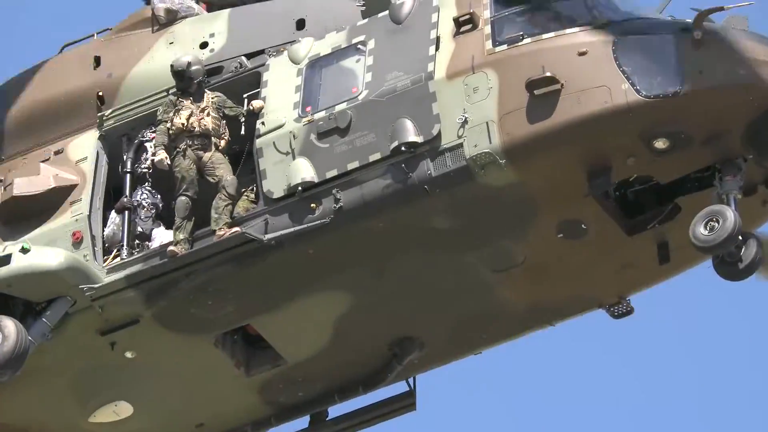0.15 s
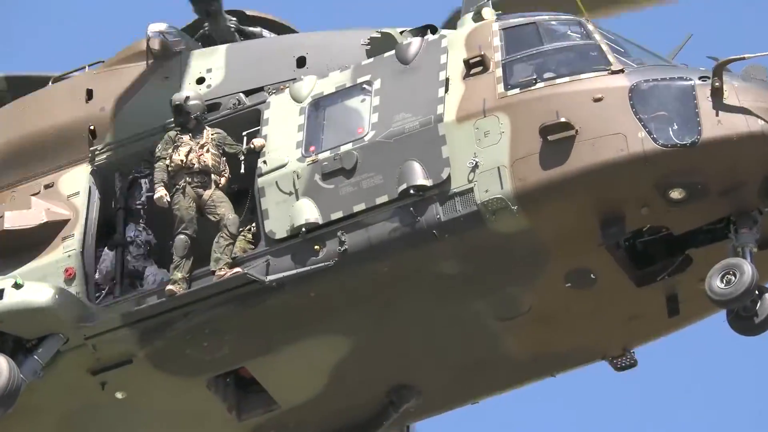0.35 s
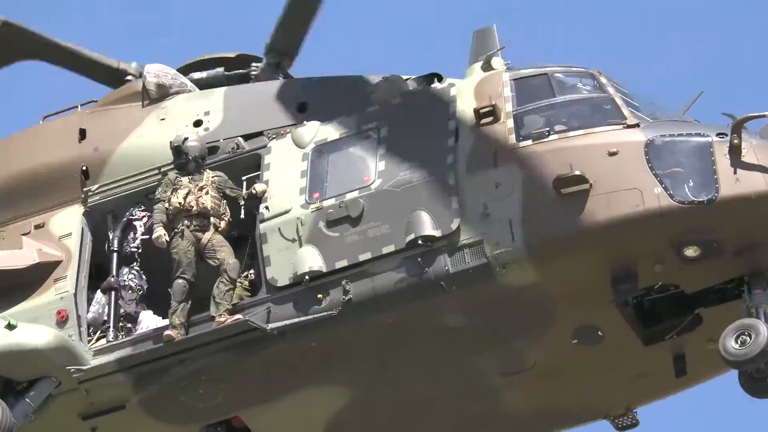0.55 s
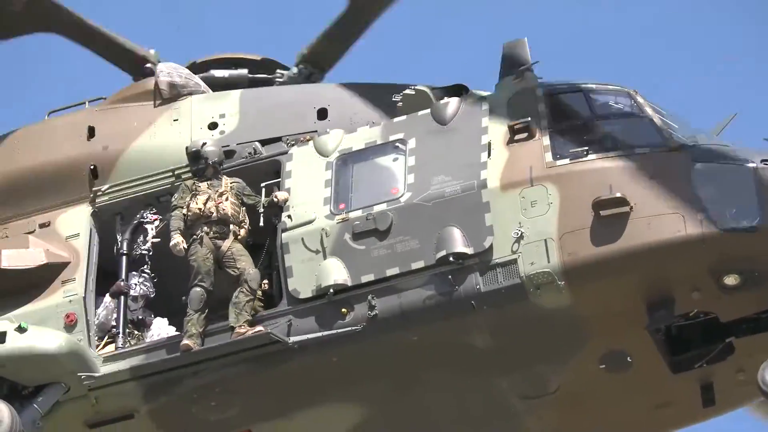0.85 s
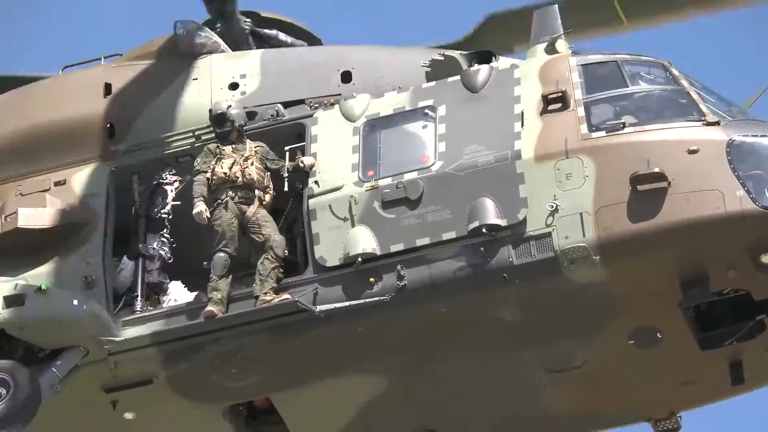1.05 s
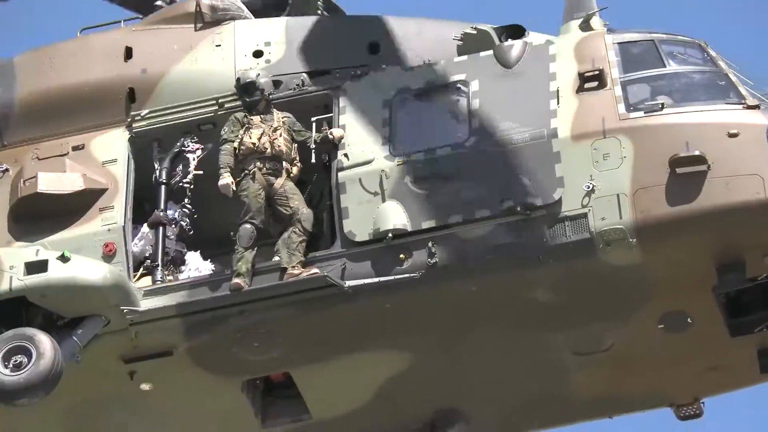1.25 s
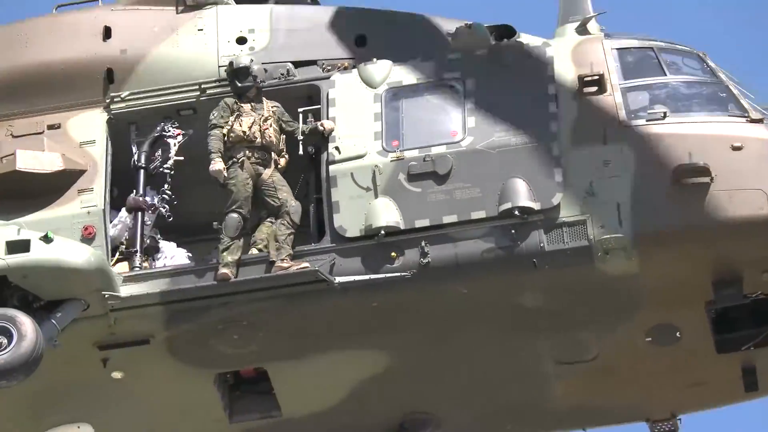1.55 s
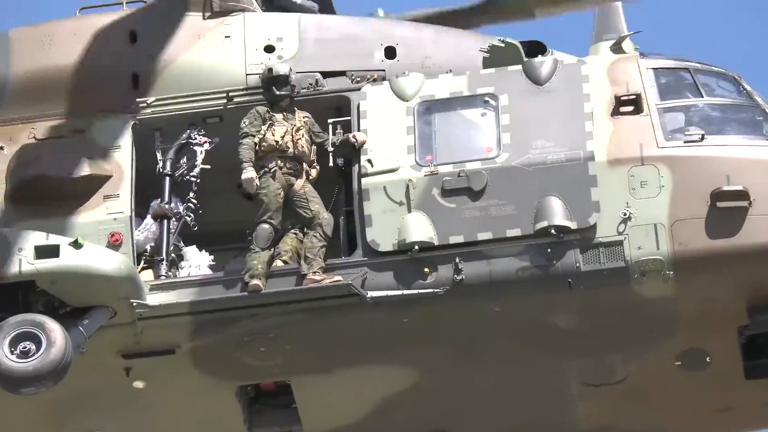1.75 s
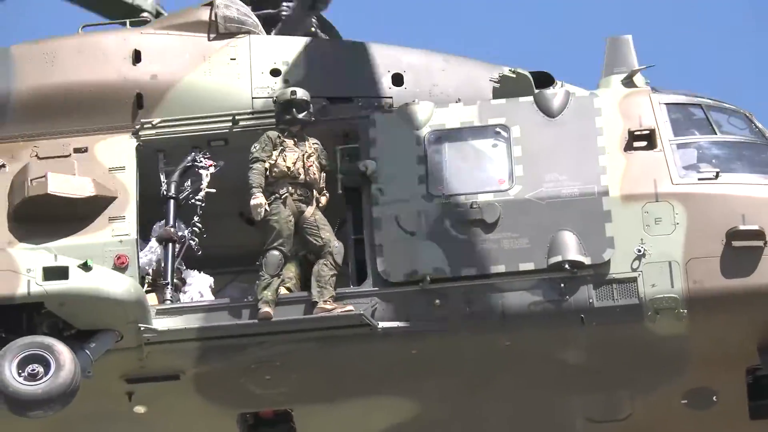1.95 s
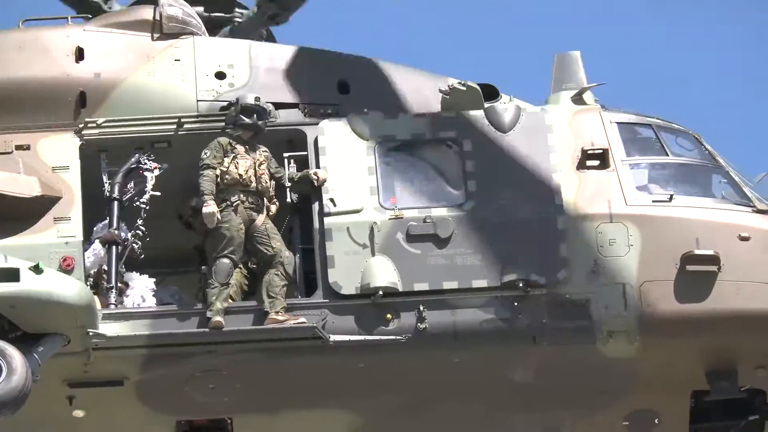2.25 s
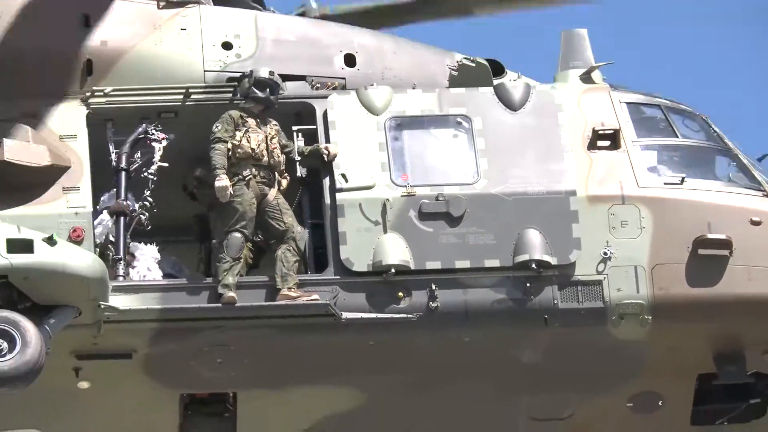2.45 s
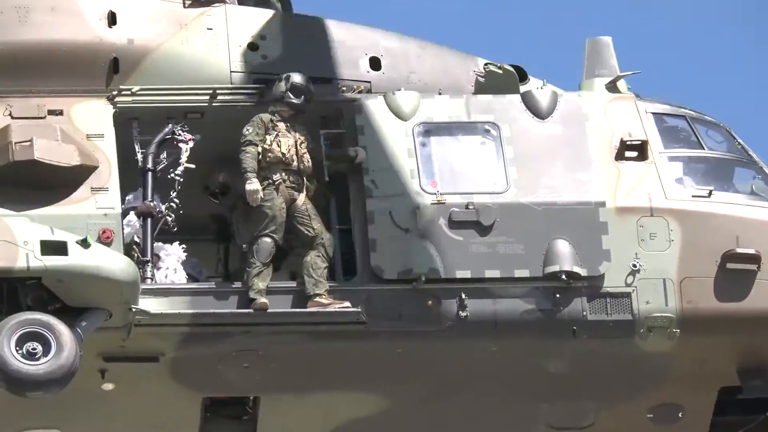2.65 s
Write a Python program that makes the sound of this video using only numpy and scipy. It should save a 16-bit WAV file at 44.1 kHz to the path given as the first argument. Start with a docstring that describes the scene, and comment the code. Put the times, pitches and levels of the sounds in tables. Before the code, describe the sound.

Close helicopter passing overhead outdoors: fast uneven chopping slaps lead at first, then harder cracks sit in a thickening roar, buzzing tail rotor and hiss; short ground echoes, wide treble, abrupt level dips from the overloaded microphone.

```python
"""Outdoors, under a low helicopter. Main blades slap, then tear the air with a crackling swish.
Slaps are pressure pulses; swish, downwash roar and turbine hiss are shaped noise; the tail rotor is
a stack of harmonics. Eddies, rumble, a hum and a knock are narrow bands of noise.
Slaps, swish, roar and hiss return off the ground milliseconds later, duller.
The level creeps up and drops abruptly, again and again."""
import sys
import numpy as np
from scipy import signal
from scipy.fft import rfft, irfft
from scipy.io import wavfile
from scipy.ndimage import uniform_filter1d, minimum_filter1d

SR = 44100
rng = np.random.default_rng(int(sys.argv[2]) if len(sys.argv) > 2 else 0)


def digitize_waveform(pressure):
    """Quantize a signal to 16-bit integers and store it at the path in sys.argv[1].

    Rows of a 2-D input are taken as channels; values are limited to [-1, 1].
    """
    field = np.atleast_2d(pressure).T
    bounded = np.clip(field, -1, 1)
    quanta = np.round(bounded * 32767).astype(np.int16)
    wavfile.write(sys.argv[1], SR, quanta)


N = 123480
T = np.arange(N) / SR
HZ = np.fft.rfftfreq(N, 1 / SR)

# Layer levels on approach: time_s, swish_db, roar_db, hiss_db, tail_rotor_db
APPROACH_LEVELS = [(0, -27.5, -31.5, -47, -38), (.3, -32.5, -32.5, -47, -43), (.6, -28, -29, -43.5, -34.5),
                   (0.901, -26, -25, -40.5, -40.5), (1.25, -24, -24, -36.5, -36.5),
                   (1.5, -24.5, -23, -36, -35.5), (1.8, -25.5, -20.5, -32.5, -26),
                   (2.1, -25.5, -18.5, -31.5, -28), (2.45, -25, -20.5, -33.5, -30),
                   (2.8, -25.5, -18.5, -30.5, -30.5)]
# Individually placed blade slaps: start_s, level_db, centre_hz
PLACED_SLAPS = [(.0287, -15, 846), (0.0852, -12, 1100), (.143, -12.5, 1070), (0.1995, -9, 1050),
                (0.258, -13, 1210), (0.3146, -13.5, 1080), (0.3805, -16, 1046), (.4312, -17, 950),
                (.4895, -24, 1190), (.6085, -12.5, 755), (0.6629, -13, 1270), (.72, -18, 1510),
                (0.755, -16.5, 1400), (0.7805, -13.5, 910), (.8381, -12, 1108), (1.006, -12.5, 1010),
                (1.1332, -12.5, 910), (1.1797, -13, 1600), (1.2439, -7.5, 1030), (1.3012, -3, 1180),
                (1.4212, -10.5, 1210), (1.4786, -9, 915), (1.5368, -12, 980), (1.656, -9, 1100),
                (1.8189, -8, 1080), (1.935, -8.5, 1430), (2.051, -3, 1543), (2.2264, -5, 1080),
                (2.4585, -5, 1100), (2.5281, -12, 1400)]
# Slap pulse spectrum: frequency_hz, relative_db
SLAP_SPECTRUM = [(60, -31), (200, -27), (450, 2.5), (900, 4.5), (1450, 1), (2100, -7), (3000, -14.5),
                 (5000, -22), (15000, -56.5)]
# Torn-air noise spectrum: frequency_hz, relative_db
SWISH_SPECTRUM = [(70, -27), (200, -9), (320, 4), (520, -2), (780, -2), (1250, -3.5), (1580, -14),
                  (2000, -7), (2800, -26), (5000, -25), (15000, -60)]
# Blade pressure pulse spectrum: frequency_hz, relative_db
THUMP_SPECTRUM = [(17, -4), (35, 2), (52, -12), (120, -5), (300, 4), (1000, -39)]
# Downwash noise spectrum: frequency_hz, relative_db
ROAR_SPECTRUM = [(20, -42), (65, -24), (100, -14), (150, -6), (205, -2), (290, -2), (520, 0), (750, 1.5),
                 (1150, -6), (1600, -14.5), (2000, -15.5), (2800, -28), (15000, -50)]
# Turbine noise spectrum: frequency_hz, relative_db
HISS_SPECTRUM = [(500, -12), (2200, 5), (2850, 0.5), (3150, 1.5), (3600, -2.5), (4200, 3), (5500, 1),
                 (6400, -10), (7200, -4.5), (8500, -6), (10000, -14.5), (15500, -17.5)]
# Flares of the hiss: middle_s, half_length_s, boost_db
HISS_FLARES = [(2.43, 0.035, 3.5), (2.526, 0.0028, 4.5)]
# Tail rotor harmonics: order, relative_db
TAIL_HARMONICS = [(1, -12.5), (2, 5.5), (3, 6), (4, -12.5), (5, 3)]
# Eddies shed by the blades: middle_s, half_length_s, centre_hz, level_db
EDDIES = [(0.464, .04, 316.4, -30), (0.623, 0.017, 317, -24.5), (0.739, 0.013, 319, -20.5),
          (.848, 0.0089, 1114, -20.5), (0.979, 0.024, 620, -28), (1.26, 0.027, 469, -26.5),
          (1.561, 0.018, 721, -19.5), (1.659, 0.039, 728, -21.5), (1.776, 0.007, 1060, -20),
          (1.804, 0.021, 424, -21.5), (2.241, 0.016, 438, -24), (2.315, 0.014, 670, -21),
          (2.37, 0.024, 817, -23), (2.375, 0.014, 266, -20), (2.458, 0.019, 714, -20.5),
          (2.47, 0.016, 168, -26.5), (2.69, 0.054, 276, -24.5), (2.759, 0.024, 402, -24)]
# Wake rumble: time_s, level_db
RUMBLE_LEVELS = [(1.55, -62.5), (2.0, -41), (2.8, -43.5)]
# Hollow hum: time_s, level_db
HUM_LEVELS = [(0, -45), (.7, -40.5), (1.6, -35.5)]
# Hollow knock: time_s, level_db
KNOCK_LEVELS = [(.44, -32), (.6, -50)]
# Stereo width of the noises: frequency_hz, side_to_mid_db
WIDTH_SPECTRUM = [(80, -56), (350, -19), (700, -16.5), (1400, -11.5), (2800, -3.5), (5500, -5), (15000, 2)]
# Stereo balance: frequency_hz, left_minus_right_db
BALANCE_SPECTRUM = [(300, .3), (2800, -.2), (5500, -1.6), (14000, -4.7)]
# Abrupt level drops: start_s, drop_db
LEVEL_DROPS = [(0.503, 9), (1.016, 7), (1.306, 2.5), (1.421, 5), (1.831, 6.5), (2.068, 5), (2.531, 6.5),
               (2.785, 3.5)]

BLADE_HZ, FIRST_BLADE_S, BLADE_JITTER_S = 17.283, 0.0267, 0.00031
ORDINARY_SLAP_DB, SLAP_REFERENCE_HZ = -21.5, 1000
AFTERCRACK_S, AFTERCRACK_DB = 0.0033, -8.5  # delay at SLAP_REFERENCE_HZ
SWISH_LEAD_S, SWISH_ATTACK_S, SWISH_HOLD_S, SWISH_DECAY_S = 0.0033, 0.0062, 0.0043, 0.028
CRACKLE_PER_S, CRACKLE_DB, CRACKLE_SPREAD_DB = 440, -7.5, 7
THUMP_DB = -60
TAIL_HZ, TAIL_WAVER_SHARE, TAIL_WAVER_HZ = 83.2, 0.0098, 6.3
TAIL_FLUTTER_DB, TAIL_FLUTTER_HZ = 3.8, 18
EDDY_WIDTH_SHARE, EDDY_SAG_SHARE_PER_S = 0.082, 0.92  # shares of the centre frequency
RUMBLE_HZ, RUMBLE_WIDTH_HZ = 117, 12.4
HUM_HZ, HUM_WIDTH_HZ, HUM_LAG_S, HUM_BEAT_DB = 324.4, 5.2, 0.029, 15.5
KNOCK_HZ, KNOCK_WIDTH_HZ, KNOCK_LAG_S, KNOCK_BEAT_DB = 826, 13, 0.0095, 18
SCATTER_DB, SCATTER_T60_S = -7.5, 0.03
ECHO_S, ECHO_GROWTH_S_PER_S, ECHO_DB, ECHO_CORNER_HZ = 0.0062, 0.00048, -9.5, 1190
CREEP_DB_PER_S, DROP_S = 15.5, 0.00098
CEILING_DB, LIMIT_S = -4, 0.004


def slaps(passes_s):
    """Blades strike the wake of the one before; placed slaps, soft to hard, crack twice."""
    placed_s = np.transpose(PLACED_SLAPS)[0]
    ordinary = abs(passes_s[:, None] - placed_s).min(1) > .005
    ordinary_clicks = clicks(passes_s, amp(ORDINARY_SLAP_DB) * ordinary)
    out = signal.oaconvolve(ordinary_clicks, pulse(SLAP_SPECTRUM))[:N]
    for start_s, level_db, centre_hz in PLACED_SLAPS:
        shifted_spectrum = np.array(SLAP_SPECTRUM) * [centre_hz / SLAP_REFERENCE_HZ, 1]
        crack = amp(level_db) * pulse(shifted_spectrum)
        aftercrack_s = AFTERCRACK_S * SLAP_REFERENCE_HZ / centre_hz
        add(out, start_s, crack)
        add(out, start_s + aftercrack_s, amp(AFTERCRACK_DB) * crack)
    return scatter(out)


def swishes(passes_s, lumpy_db=2.0, lumpy_hz=220):
    """Torn air around each blade pass: a lumpy noise rush with small random cracks."""
    envelope = np.zeros(N)
    for pass_s in passes_s:
        age_s = T - pass_s + SWISH_LEAD_S
        attack = np.clip(age_s / SWISH_ATTACK_S, 0, 1)
        envelope += attack * np.exp(-np.maximum(age_s - SWISH_HOLD_S, 0) / SWISH_DECAY_S)
    rush = unit(noise(SWISH_SPECTRUM) * amp(lumpy_db * wander(lumpy_hz)))
    struck = rng.random(N) < CRACKLE_PER_S / SR
    cracks = struck * amp(CRACKLE_SPREAD_DB * np.minimum(rng.exponential(1, N), 3))
    crackle = unit(scatter(signal.oaconvolve(cracks, pulse(SLAP_SPECTRUM))[:N]))
    return approach(1) * unit(envelope) * (rush + amp(CRACKLE_DB) * crackle)


def thump(passes_s):
    """Deep pressure pulse as each blade pushes the air."""
    pushes = clicks(passes_s, np.ones(len(passes_s)))
    return amp(THUMP_DB) * unit(signal.oaconvolve(pushes, pulse(THUMP_SPECTRUM, size=16384))[:N])


def downwash(gust_db=1.07, gust_hz=70):
    """Gusty broadband roar of the rotor wake."""
    return approach(2) * unit(noise(ROAR_SPECTRUM) * amp(gust_db * wander(gust_hz)))


def tail_rotor():
    """Harmonics of a wavering blade rate, each fluttering in level."""
    turns = np.cumsum(TAIL_HZ * (1 + TAIL_WAVER_SHARE * wander(TAIL_WAVER_HZ))) / SR
    stack = np.zeros(N)
    for order, level_db in TAIL_HARMONICS:
        gain = amp(level_db + TAIL_FLUTTER_DB * wander(TAIL_FLUTTER_HZ))
        stack += gain * np.cos(2 * np.pi * (round(order) * turns + rng.random()))
    return approach(4) * unit(stack)


def turbines(flutter_db=1.2, flutter_hz=120):
    """Exhaust hiss: noise fluttering in level, with brief flares."""
    flare_db = np.zeros(N)
    for middle_s, half_length_s, boost_db in HISS_FLARES:
        flare_db += boost_db * np.exp(-((T - middle_s) / half_length_s) ** 2)
    return approach(3) * noise(HISS_SPECTRUM) * amp(flare_db + flutter_db * wander(flutter_hz))


def eddies(size=8192):
    """Shed eddies: narrow noise bands that swell, sag in pitch and die."""
    out = np.zeros(N)
    t = (np.arange(size) - size / 2) / SR
    hz = np.fft.fftfreq(size, 1 / SR)
    for middle_s, half_length_s, centre_hz, level_db in EDDIES:
        band = np.exp(-.5 * (hz / (EDDY_WIDTH_SHARE * centre_hz)) ** 2)
        churn = np.fft.ifft(band * np.exp(2j * np.pi * rng.random(size)))
        swell = np.exp(-(t / half_length_s) ** 2)
        cycles = centre_hz * (t - EDDY_SAG_SHARE_PER_S * t ** 2 / 2)
        surge = swell * (churn * np.exp(2j * np.pi * cycles)).real
        level = amp(level_db) * np.linalg.norm(swell) / np.linalg.norm(surge)
        add(out, middle_s + t[0], level * surge)
    return out


def hum():
    """Hollow narrow-band noise throbbing at the main blade rate."""
    return narrow(HUM_HZ, HUM_WIDTH_HZ, HUM_LEVELS) * beat(HUM_BEAT_DB, HUM_LAG_S)


def knock():
    """Hollow narrow-band noise pulsing at the blade rate, fading early on."""
    return narrow(KNOCK_HZ, KNOCK_WIDTH_HZ, KNOCK_LEVELS) * beat(KNOCK_BEAT_DB, KNOCK_LAG_S)


def rumble():
    """Wake rumble: a low noise band that fades in late."""
    return narrow(RUMBLE_HZ, RUMBLE_WIDTH_HZ, RUMBLE_LEVELS)


def scatter(x, low_hz=250):
    """Nearby ground and airframe smear a sharp sound into a short tail in each ear."""
    t = T[:SR // 5]
    highpass = signal.butter(2, low_hz, "high", fs=SR)
    tail = signal.lfilter(*highpass, rng.standard_normal((2, len(t))))
    tail *= amp(-60 * t / SCATTER_T60_S)
    tail /= np.linalg.norm(tail, axis=1, keepdims=True)
    return x + amp(SCATTER_DB) * signal.oaconvolve(x[None], tail, axes=1)[:, :N]


def ground(x):
    """Adds a duller reflection, later as the helicopter stands higher in the sky."""
    dull = irfft(rfft(x) / np.sqrt(1 + (HZ / ECHO_CORNER_HZ) ** 2), N)
    source_s = T - ECHO_S - ECHO_GROWTH_S_PER_S * T
    echo = np.array([np.interp(source_s, T, ear, left=0) for ear in dull])
    return x + amp(ECHO_DB) * echo


def approach(column):
    """Gain of one layer as the helicopter comes closer."""
    table = np.transpose(APPROACH_LEVELS)
    return amp(np.interp(T, table[0], table[column]))


def beat(depth_db, lag_s):
    """Gain of rms 1 cycling at the blade rate, peaking lag_s after each nominal pass."""
    return unit(amp(depth_db * np.cos(2 * np.pi * BLADE_HZ * (T - FIRST_BLADE_S - lag_s))))


def noise(spectrum):
    """Stereo noise of rms 1, alike in both ears in the bass and less so in the treble."""
    mid, side = rfft(rng.standard_normal((2, N)))
    width = amp(read(WIDTH_SPECTRUM))
    ears = np.array([mid + width * side, mid - width * side])
    return unit(irfft(ears * amp(read(spectrum)) / np.sqrt(1 + width ** 2), N))


def narrow(centre_hz, width_hz, levels):
    """Gaussian band of noise on a level curve."""
    band = np.exp(-.5 * ((HZ - centre_hz) / width_hz) ** 2)
    tone = unit(irfft(rfft(rng.standard_normal(N)) * band, N))
    return tone * amp(np.interp(T, *np.transpose(levels)))


def pulse(spectrum, size=4096):
    """Causal minimum-phase pressure pulse of peak 1."""
    log_gain = np.log(amp(read(spectrum, abs(np.fft.fftfreq(size, 1 / SR)))))
    wave = np.fft.ifft(np.exp(np.conj(signal.hilbert(log_gain)))).real[:size // 2]
    return -wave / abs(wave).max()


def clicks(times_s, gains):
    """Train of one-sample clicks."""
    return np.bincount(np.round(np.abs(times_s) * SR).astype(int), gains, N)[:N]


def wander(rate_hz):
    """Smooth random motion of rms 1."""
    lowpass = np.exp(-(HZ / rate_hz) ** 2) * (HZ > 0)
    return unit(irfft(rfft(rng.standard_normal(N)) * lowpass, N))


def add(mix, start_s, sound):
    """Mixes a sound in at start_s."""
    part = mix[max(round(start_s * SR), 0):][:len(sound)]
    part += sound[:len(part)]


def read(points, hz=HZ):
    """Interpolates a spectrum on a log-frequency axis."""
    f, value = np.transpose(points)
    return np.interp(np.log(hz + 1), np.log(f), value)


def amp(db):
    """Decibels to gain."""
    return 10 ** (np.asarray(db) / 20)


def unit(x):
    """Scales to rms 1."""
    return x / np.sqrt(np.mean(x ** 2) + 1e-20)


def limit(x):
    """Peak limiter with one smoothed gain for both ears."""
    size = max(round(LIMIT_S * SR), 2)
    gain = np.minimum(amp(CEILING_DB) / (abs(x).max(0) + 1e-9), 1)
    return x * uniform_filter1d(minimum_filter1d(gain, size), size)


def scene():
    """Both rotors and the turbines; slaps, swish, roar and hiss also reach the ground."""
    passes_s = np.arange(FIRST_BLADE_S, N / SR, 1 / BLADE_HZ)
    passes_s = passes_s + BLADE_JITTER_S * rng.standard_normal(len(passes_s))
    air = ground(slaps(passes_s) + swishes(passes_s) + downwash() + turbines())
    return air + thump(passes_s) + tail_rotor() + eddies() + hum() + knock() + rumble()


def record(dry, start_db=-3):
    """Level creeps up between abrupt drops; treble leans right; then limiter and low-pass."""
    level_db = start_db + CREEP_DB_PER_S * T
    for start_s, drop_db in LEVEL_DROPS:
        level_db = level_db - drop_db * np.clip((T - start_s) / DROP_S, 0, 1)
    balance_db = np.outer([.5, -.5], read(BALANCE_SPECTRUM))
    leaning = irfft(rfft(dry * amp(level_db)) * amp(balance_db), N)
    lowpass = signal.firwin(801, 15750, window=("kaiser", 9), fs=SR)
    return signal.oaconvolve(limit(leaning), lowpass[None], "same")


dry = scene()
out = record(dry)
digitize_waveform(out)
```